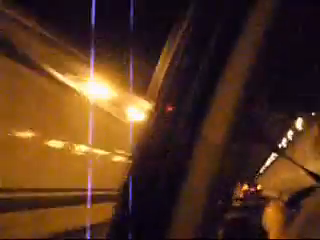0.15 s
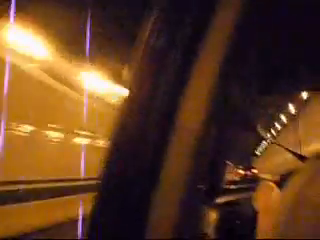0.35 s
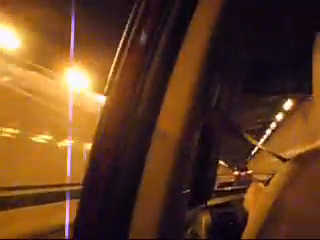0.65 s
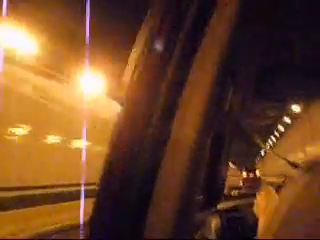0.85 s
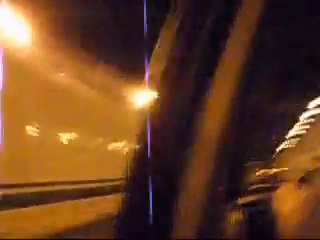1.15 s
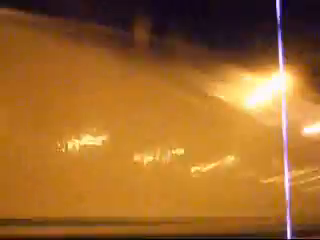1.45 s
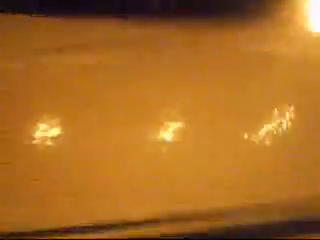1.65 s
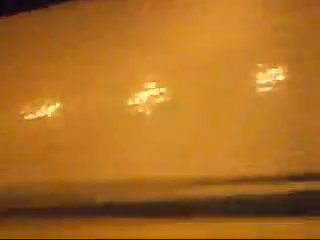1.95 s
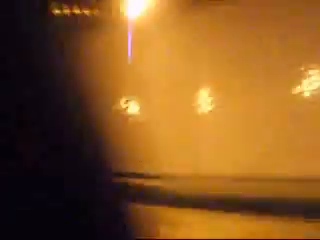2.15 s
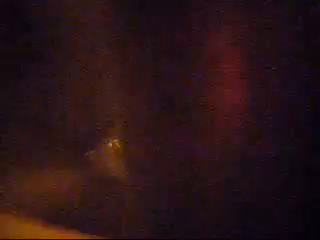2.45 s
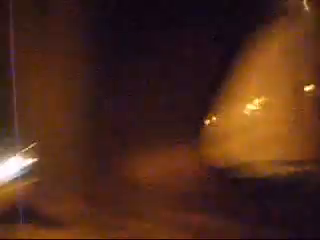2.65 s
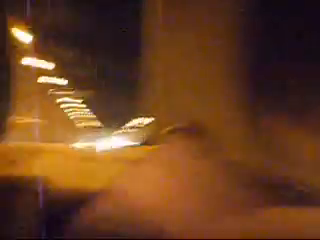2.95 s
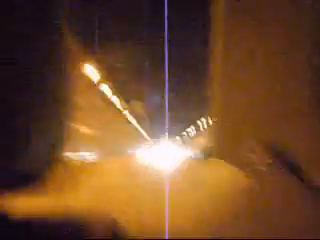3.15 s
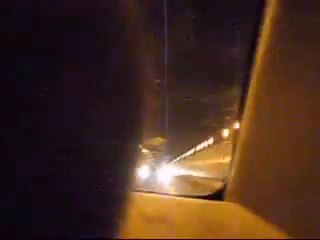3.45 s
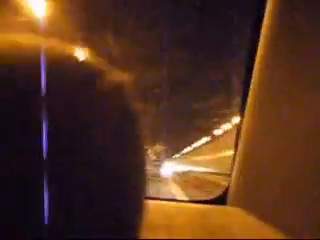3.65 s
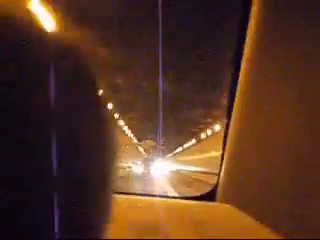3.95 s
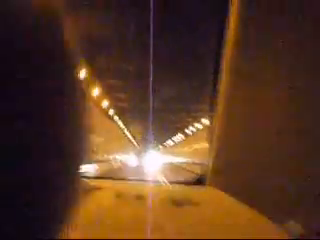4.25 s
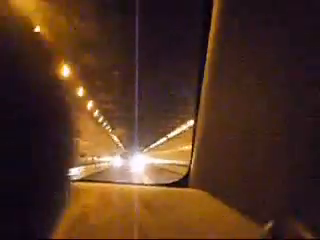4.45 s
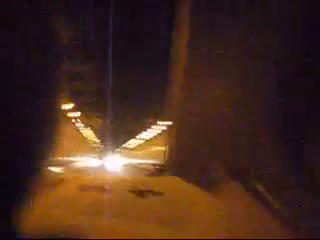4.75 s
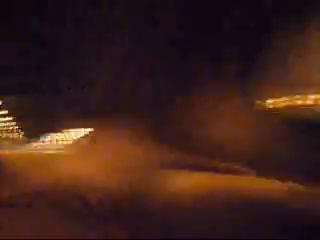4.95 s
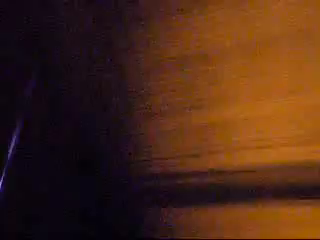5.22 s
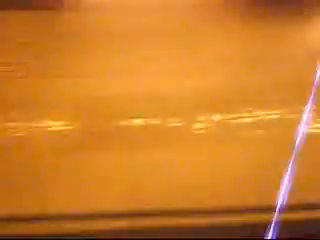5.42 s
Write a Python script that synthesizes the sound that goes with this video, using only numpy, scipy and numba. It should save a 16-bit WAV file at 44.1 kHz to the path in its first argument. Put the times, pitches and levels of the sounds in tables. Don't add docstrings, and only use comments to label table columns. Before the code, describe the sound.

Loud tunnel roar inside a moving car, chopped into ragged pieces by wind gusts that thump the microphone and cut the sound out.

```python
import sys
import numpy as np
from scipy import signal
from scipy.fft import rfft, irfft
from scipy.io import wavfile
from scipy.ndimage import uniform_filter1d
from numba import njit

SR = 44100
rng = np.random.default_rng(int(sys.argv[2]) if len(sys.argv) > 2 else 0)


def natural_amplitude(level_db):
    exponent = np.asarray(level_db, float) / 20
    return 10 ** exponent


def dump(signal):
    limited = np.clip(np.atleast_2d(signal).T, -1, 1)
    pcm = np.round(limited * 32767).astype(np.int16)
    wavfile.write(sys.argv[1], SR, pcm)


N = 246078

RATE_HZ = 8000
STEPS = N * RATE_HZ // SR + 2
STEP_S = np.arange(STEPS) / RATE_HZ
OPEN_DB = 2


def evened(x):
    return x / np.sqrt(np.mean(x ** 2) + 1e-20)


def curve(rows, column=1):
    rows = np.array(rows)
    return np.interp(STEP_S, rows[:, 0], rows[:, column])


def noise(spectrum, patchy_db, flicker_db, tilt_db=0, hump_db=0):
    hop, size = 32, 128
    frames = STEPS // hop + 5
    hz = np.fft.rfftfreq(size, 1 / RATE_HZ)
    a, b, patches = rng.standard_normal((frames, len(hz), 3)).T
    patches = uniform_filter1d(patches, size=5, axis=0)
    patches = evened(uniform_filter1d(patches, size=8, axis=1))
    flicker = evened(uniform_filter1d(rng.standard_normal(frames), size=2))

    def per_frame(x):
        return np.resize(x * np.ones(STEPS), frames * hop)[::hop]

    octaves = np.log2(np.maximum(hz, 300) / 850)[:, None]
    hump = np.exp(-(octaves / 0.31) ** 2) - 1
    colour_db = per_frame(tilt_db) * octaves + per_frame(hump_db) * hump
    z = (a + 1j * b) * natural_amplitude(patchy_db * patches + flicker_db * flicker + colour_db)
    x = signal.istft(z, nperseg=size, noverlap=size - hop)[1][:STEPS]
    f, db = np.transpose(spectrum)
    fine_hz = np.fft.rfftfreq(STEPS, 1 / RATE_HZ)
    shape_db = np.interp(np.log(fine_hz + 1), np.log(f + 1), db)
    return evened(irfft(rfft(x) * natural_amplitude(shape_db), STEPS))


# time in seconds, share turned away 0-1, air level in dB.
TURN = [(0, 0.07, -5), (.4, 0, -4), (.8, 0.08, -6.5), (1.5, 0.1, -5), (2, 0.1, -3), (2.5, 0.36, -5),
        (3, 0.94, -5.5), (3.3, 0.8, -6.5), (3.6, 0.8, -7), (4, 0.73, -7.5), (4.5, 0.64, -7.5),
        (5, 0.58, -5), (5.58, 0.07, -6.5)]
ROAR_LOSS_DB = -7.5
# frequency in Hz, density in dB per Hz.
ROAR_SPECTRUM = [(250, -32.5), (400, -9.5), (550, -6.5), (720, -3), (950, -3), (1150, -6), (1400, -11.5),
                 (2000, -17.5), (2600, -28), (3300, -27.5), (4000, -41.5)]


def roar():
    away = curve(TURN)
    tilt_db_per_octave = -0.5 + 0.95 * away
    air = noise(ROAR_SPECTRUM, patchy_db=2.5, flicker_db=1.5, tilt_db=tilt_db_per_octave, hump_db=5 - 9 * away)
    return natural_amplitude(curve(TURN, column=2) + ROAR_LOSS_DB * away - 4.0) * air


# frequency in Hz, density in dB per Hz.
WIND_SPECTRUM = [(15, -50), (40, -14.5), (100, -3), (200, -2), (350, -1.5), (600, -12.5), (1200, -8.5),
                 (4000, -38)]


def wind():
    swell = np.ones(STEPS)
    for s, peak, rebound, *_ in gusts():
        swell += 8.5 * rebound * np.exp(-abs(s - STEP_S) / 0.0071) * (STEP_S < s)
    level_db = curve(TURN, column=2) - 19.5 + (21.5 + ROAR_LOSS_DB) * curve(TURN)
    return natural_amplitude(level_db) * swell * noise(WIND_SPECTRUM, patchy_db=2.5, flicker_db=4.0)


# start in seconds, rebound of full scale, first cut in dB, sag in seconds, lowest gain in dB.
SLAMS = [(0.5625, 0.27, -39, 0.093, -36.5), (1.7222, 0.086, -14.5, 0.044, -46),
         (2.0733, 0.064, -16, 0.035, -33.5), (2.266, 0.039, -23, 0.048, -29),
         (2.4996, 0.057, -23.5, 0.054, -30.5), (2.965, 0.067, -22.5, 0.06, -31.5),
         (3.1334, .245, -55.5, 0.11, -19.5), (3.3192, .05, -16.5, 0.05, -26),
         (3.452, 0.028, -22, 0.042, -23.5), (3.763, 0.082, -20, 0.05, -23),
         (3.8635, .103, -18.5, 0.049, -26), (4.0324, .24, -20.5, 0.093, -35),
         (4.1889, 0.051, -21.5, 0.046, -25.5), (4.4212, .152, -16.5, 0.053, -26.5),
         (4.6856, 0.041, -32, 0.057, -25.5), (4.7978, 0.058, -14, 0.052, -23.5),
         (4.9182, 0.13, -23.5, 0.072, -24.5), (5.4521, 0.087, -17, 0.049, -32)]
# start in seconds, first cut in dB, sag in seconds, lowest gain in dB.
BLOWS = [(0.087, -28, 0.0086, -33.5), (.195, -20, 0.028, -19), (.29, -23, 0.052, -21.5),
         (0.7696, -20, 0.038, -23), (0.8771, -20.5, .03, -23.5), (1.0955, -12.5, 0.035, -23.5),
         (1.217, -20, 0.023, -14.5), (1.6221, -23.5, 0.027, -23.5), (1.852, -24, 0.027, -27.5),
         (1.9465, -62, 0.02, -38), (2.198, -11, 0.0084, -25.5), (2.4297, -23.5, 0.037, -11),
         (2.6091, -40, 0.013, -26.5), (2.7688, -16, 0.03, -24.5), (2.8562, -16.5, 0.054, -26),
         (3.0698, -43, 0.014, -23.5), (3.6133, -15, 0.019, -26), (4.2897, -18, 0.039, -16),
         (4.5618, -48, 0.015, -40), (4.6528, -16, 0.019, -7.5), (5.0398, -24, 0.038, -16.5),
         (5.1251, -17.5, 0.043, -25.5), (5.2267, -22, 0.023, -16.5)]
# start in seconds, cut in dB, reopening time in seconds.
PUFFS = [(.012, -7.5, 0.03), (0.5426, -14, 0.019), (0.4297, -7, 0.03), (1.0327, -9, 0.0098),
         (1.3505, -12, 0.02), (1.431, -13, 0.048), (1.484, -6, 0.042), (2.3709, -14, 0.024),
         (2.668, -20, 0.054), (3.2676, -14, 0.042), (3.4148, -4, 0.045), (3.5875, -13, 0.032),
         (3.716, -11.5, .032), (3.9699, -19.5, 0.041), (4.36, -23, 0.033), (4.535, -18, 0.02),
         (5.2767, -11.5, 0.024), (5.3706, -19, 0.029), (5.5753, -12, .03)]


def gusts():
    puff_peak, small_rebound = 0.66, 0.022
    slams = [(s, 1, *rest) for s, *rest in SLAMS]
    blows = [(s, 1, small_rebound, *rest) for s, *rest in BLOWS]
    puffs = [(s, puff_peak, small_rebound, db, back_s, OPEN_DB) for s, db, back_s in PUFFS]
    return sorted(slams + blows + puffs)


def overloads():
    spikes, swings = np.zeros(STEPS), np.zeros(STEPS)
    for s, peak, rebound, *_ in gusts():
        t = STEP_S - s
        width_s = np.where(t < 0, 0.00016 + 0.0006 * rebound, 0.00025 + 0.0007 * rebound)
        spikes += peak * np.exp(-0.5 * (t / width_s) ** 2)
        swings -= 0.42 * peak * np.exp(-0.5 * ((t + 0.0005 + rebound / 1000) / 0.0002) ** 2)
        since = np.maximum(t - 0.0003, 0)
        swings -= 1.9 * rebound * (np.exp(-since / 0.0042) - np.exp(-since / 0.0005))
    return spikes, swings


def gain_control():
    climb_db_per_s = 623
    db = np.full(STEPS, float(OPEN_DB))
    for s, peak, rebound, first_db, sag_s, low_db in gusts():
        sag_s = max(sag_s, 0.002)
        open_s = sag_s + max(OPEN_DB - low_db, 0.1) / climb_db_per_s
        before_db = db[int(s * RATE_HZ)]
        path_db = np.interp(STEP_S - s, [0, 0.0007, sag_s, open_s], [before_db, first_db, low_db, OPEN_DB])
        db = np.where(STEP_S < s, db, path_db)
    return natural_amplitude(db)


@njit
def flinch(x, limit, cut, recover):
    out, gain = np.empty_like(x), 1.
    for n in range(len(x)):
        out[n] = gain * x[n]
        gain = 1 - (1 - gain) * recover
        if out[n] > limit:
            gain /= 1 + cut * (out[n] - limit)
    return out


def squeezed(x):
    knee, room = 0.5, 0.26
    return np.where(x > knee, knee + room * np.tanh((x - knee) / room), x)


# time in seconds, level in dB.
CRACKS = [
    (2.8519, -10),
    (2.9609, -15),
    (3.1845, -36),
    (4.0222, -16),
    (4.2804, -16),
    (4.7929, -11),
]


def cracks():
    shape = sum(natural_amplitude(db) * np.exp(-0.5 * ((STEP_S - s) / 0.00037) ** 2) for s, db in CRACKS)
    return shape * np.diff(np.sign(rng.standard_normal(STEPS + 1)))


def grit(x):
    return natural_amplitude(-15 + 1.4 * curve(TURN)) * abs(x) ** 2.7 * rng.standard_normal(STEPS)


def hiss(awake):
    ticks_db = 0.92 * np.minimum(rng.exponential(1, STEPS // 16 + 1), 3)
    lumps = evened(np.repeat(natural_amplitude(ticks_db), 16)[:STEPS])
    return natural_amplitude(-33.5) * awake * lumps * rng.standard_normal(STEPS)


def fizz(awake):
    return natural_amplitude(-30.5) * np.interp(np.arange(N) / SR, STEP_S, awake) * np.diff(rng.standard_normal(N + 1))


def held(x):
    return signal.resample_poly(np.repeat(x, 6), 147, 160)[:N]


# time in seconds, chance 0-1.
THRIFT = [(0, .9), (2, .9), (2.3, .25), (4.9, .25), (5.2, .7)]
# frequency in Hz, share of time 0-1.
KEPT = [(10000, 1), (10500, .93), (11650, .9), (11780, .35), (12100, .2), (12300, .08), (12640, .12),
        (12720, .6), (12830, .6)]


def thrifty_treble(x):
    copy_from_hz, copy_bins, edge_hz = 10330, 96, 12830
    hz, t, z = signal.stft(x, SR, nperseg=1024)
    wide = np.sqrt(abs(uniform_filter1d(abs(z) ** 2, size=40, axis=0)))
    a, b = rng.standard_normal((len(t), len(hz), 2)).T
    z += natural_amplitude(-38.5) * wide * (a + 1j * b) * (hz > 1500)[:, None]

    top = (hz > copy_from_hz) & (hz < edge_hz)
    copy = np.roll(z, copy_bins, 0)[top]
    copy = copy + natural_amplitude(-9) * np.roll(wide * (b + 1j * a), copy_bins, 0)[top]
    z[top] = copy * natural_amplitude(-9 + 0.15 * (hz[top] - copy_from_hz) / 1000)[:, None]

    high = hz > copy_from_hz
    slow = np.sqrt(abs(uniform_filter1d(abs(z[high]) ** 2, size=9)))
    slow = uniform_filter1d(slow, size=12, axis=0)
    quick = np.sqrt(abs(uniform_filter1d(abs(z[high]) ** 2, size=12, axis=0))) + 1e-9
    sluggish = np.interp(hz[high], [copy_from_hz, edge_hz], [0.3, 0.7])[:, None]
    z[high] *= (slow / quick) ** sluggish

    thrift = np.interp(t, *np.transpose(THRIFT))
    chance = np.repeat(rng.random((len(t) // 8 + 1, 3)), 8, 0)[:len(t)].T
    z[(hz > 7780) & (hz < 8230)] *= chance[0] > thrift
    z[(hz > 7920) & (hz < 8090)] *= chance[1] > 0.85

    drift = np.repeat(rng.standard_normal((len(t), len(hz) // 2 + 1)), 2, 1)[:, :len(hz)].T
    drift = uniform_filter1d(drift, size=13)
    drift += 0.5 * drift[300]
    rank = drift.argsort(1).argsort(1) / len(t)
    kept = np.interp(hz, *np.transpose(KEPT), right=0)[:, None]
    z *= (rank < kept) * natural_amplitude(7.3 * (hz > 12600))[:, None]
    return signal.istft(z, SR, nperseg=1024)[1][:N]


def scene():
    spikes, swings = overloads()
    gain = gain_control()
    awake = gain / (gain + natural_amplitude(-12.5))
    air = flinch((roar() + wind()) * gain, 0.69, 1.6, np.exp(-1 / (0.0053 * RATE_HZ)))
    x = squeezed(air) * np.clip(1 - 1.5 * spikes, 0, 1) + 1.12 * spikes + swings
    clipped = np.clip(x + grit(x) + cracks(), -1, 1)
    offset = 0.005 * (1.05 + 1.7 / (1 + 30 * gain))
    return (held(clipped + hiss(awake) + offset) + fizz(awake))[None]


def top_cut(x):
    return signal.sosfilt(signal.butter(12, 12930, fs=SR, output="sos"), x)


def record(dry):
    mix = np.clip(thrifty_treble(dry[0])[None], -1, 1)
    return top_cut(mix)


dry = scene()
out = record(dry)
dump(out)
```